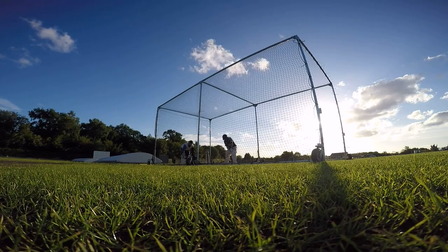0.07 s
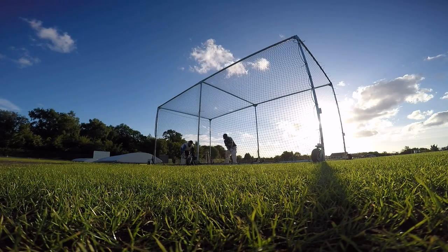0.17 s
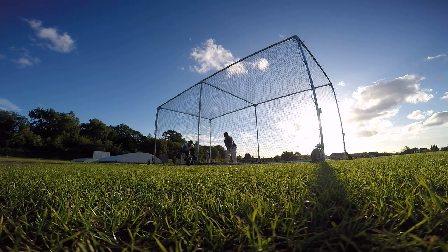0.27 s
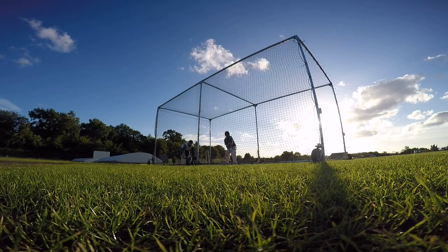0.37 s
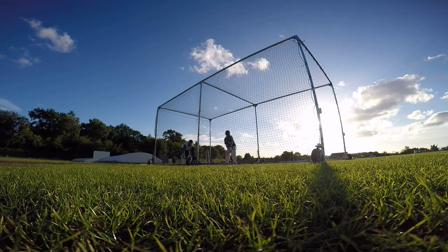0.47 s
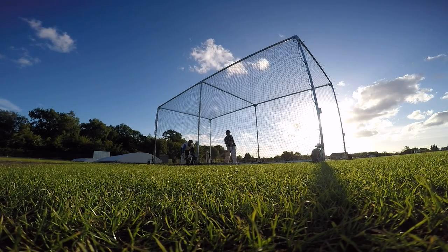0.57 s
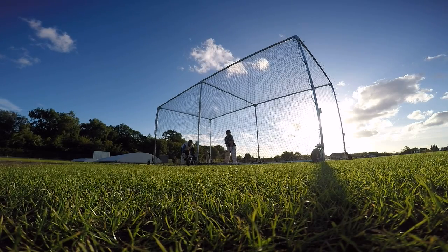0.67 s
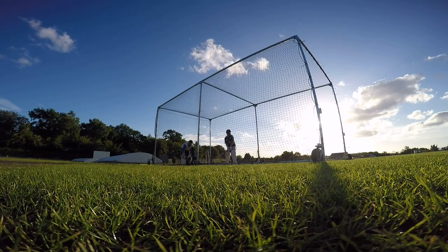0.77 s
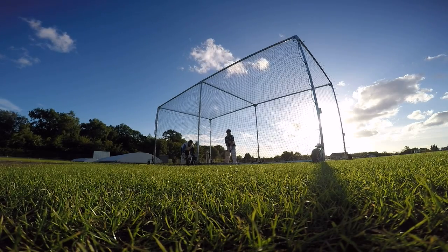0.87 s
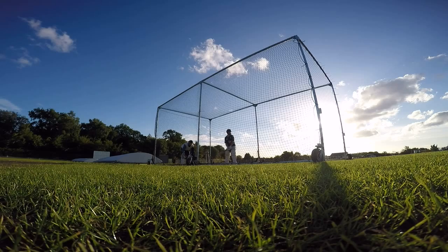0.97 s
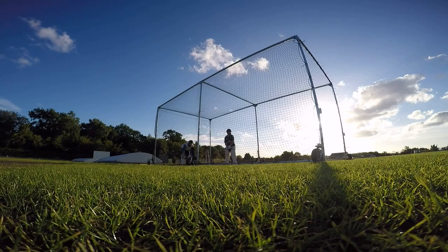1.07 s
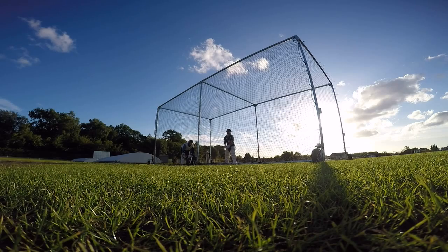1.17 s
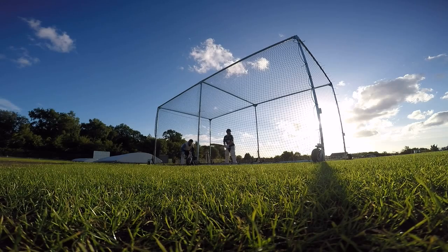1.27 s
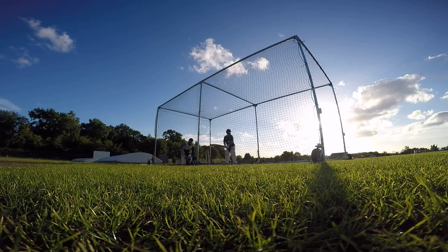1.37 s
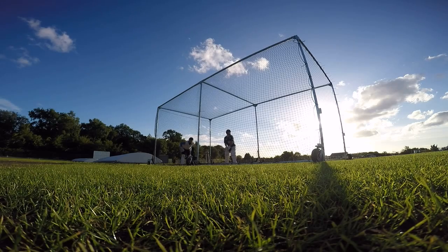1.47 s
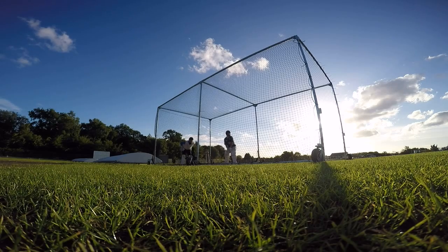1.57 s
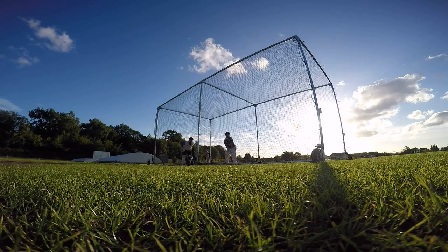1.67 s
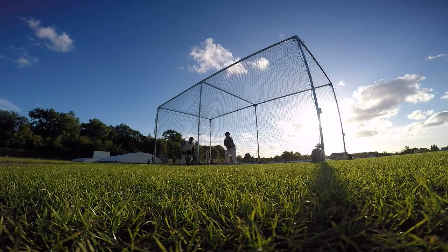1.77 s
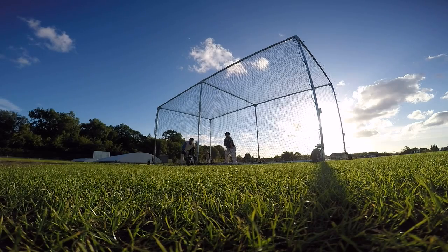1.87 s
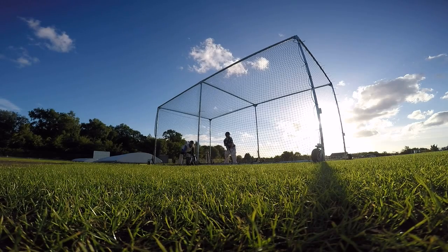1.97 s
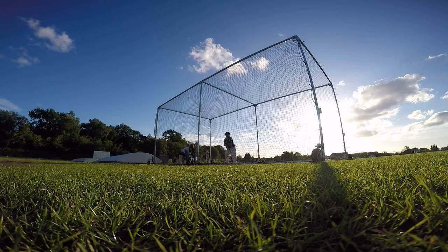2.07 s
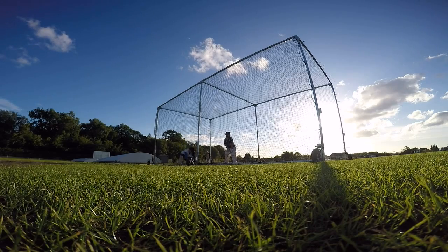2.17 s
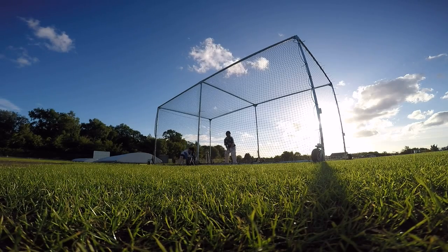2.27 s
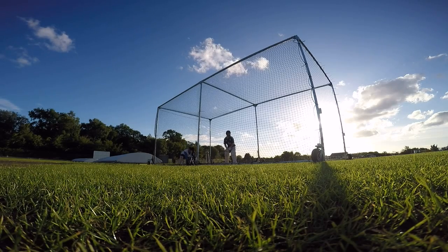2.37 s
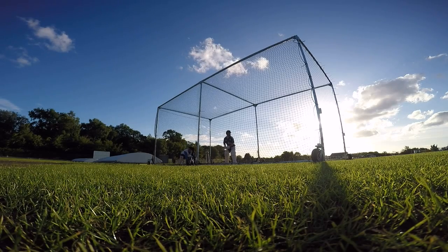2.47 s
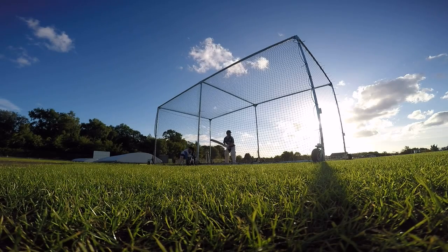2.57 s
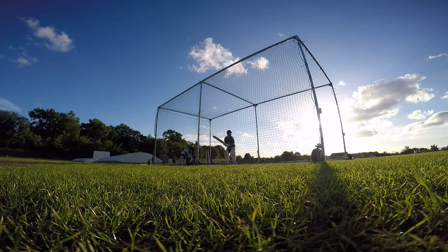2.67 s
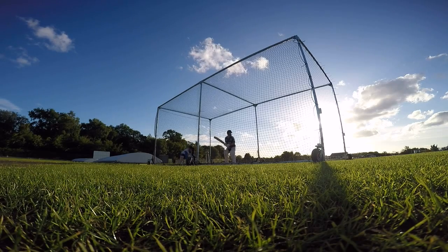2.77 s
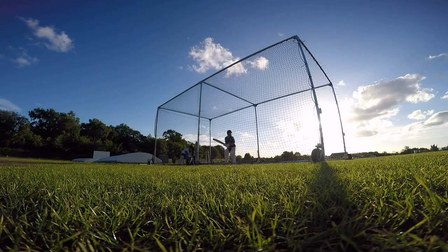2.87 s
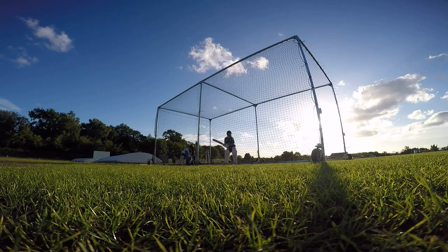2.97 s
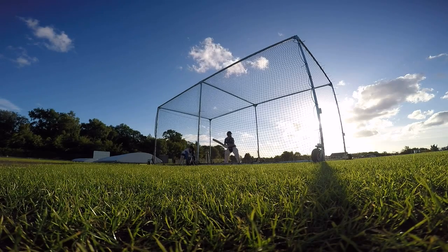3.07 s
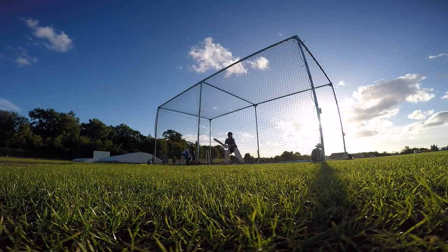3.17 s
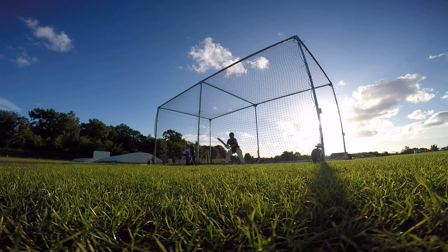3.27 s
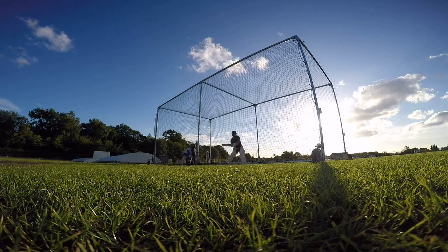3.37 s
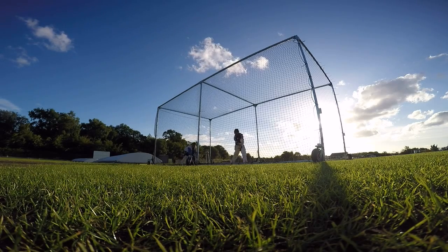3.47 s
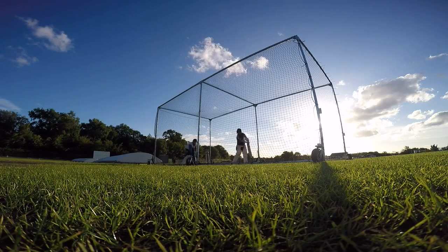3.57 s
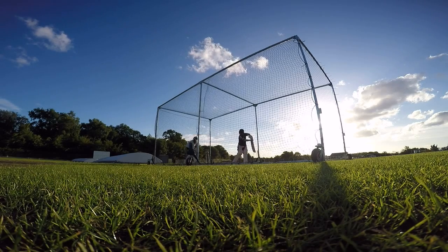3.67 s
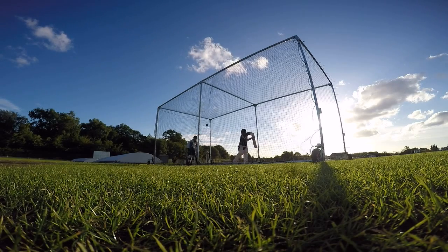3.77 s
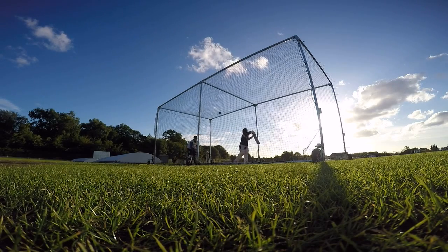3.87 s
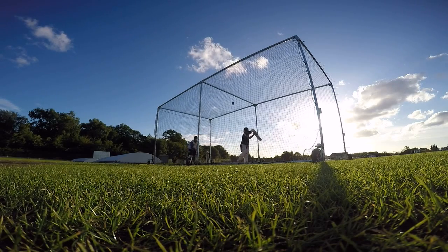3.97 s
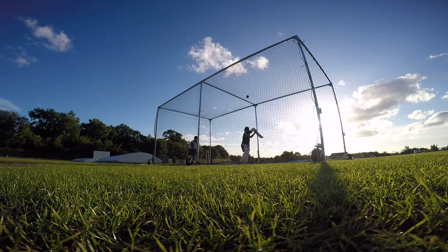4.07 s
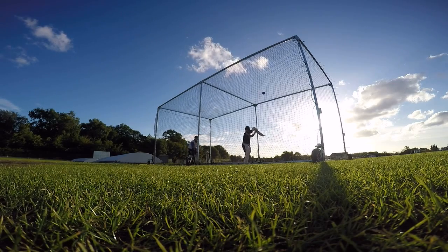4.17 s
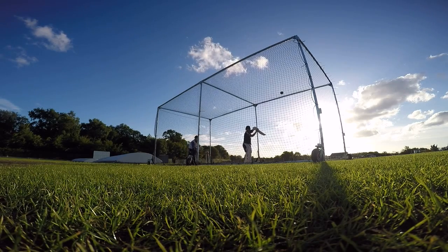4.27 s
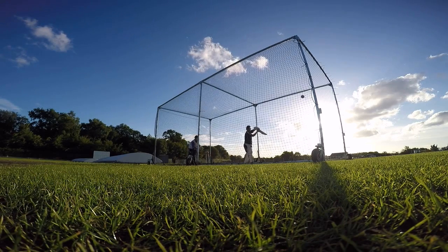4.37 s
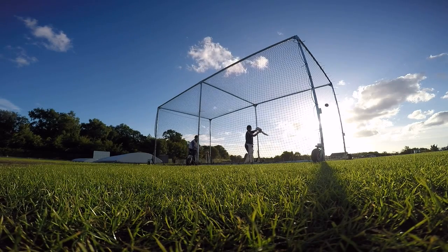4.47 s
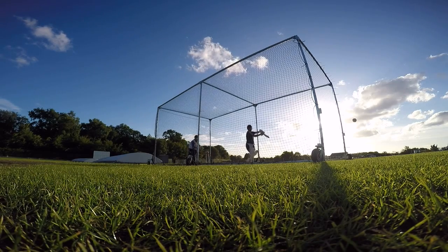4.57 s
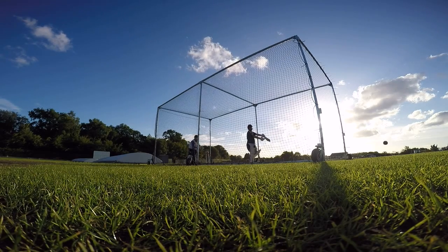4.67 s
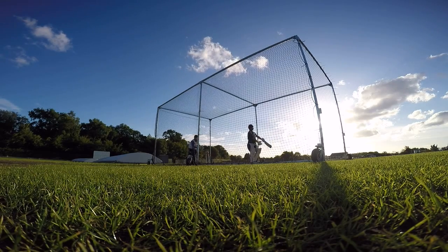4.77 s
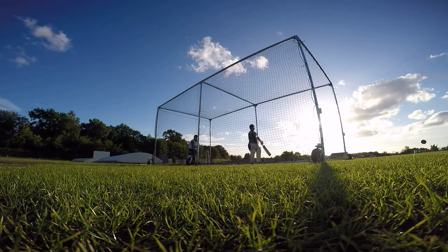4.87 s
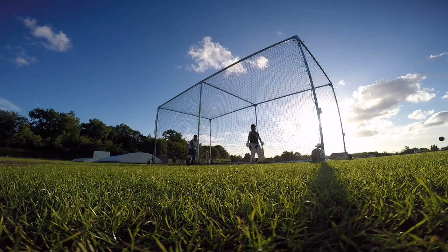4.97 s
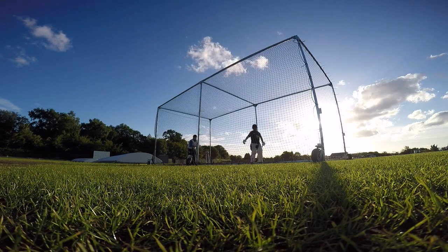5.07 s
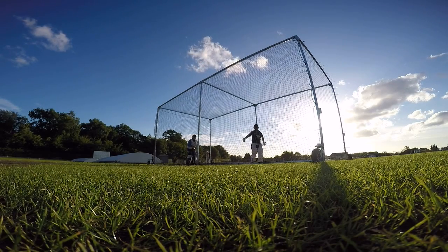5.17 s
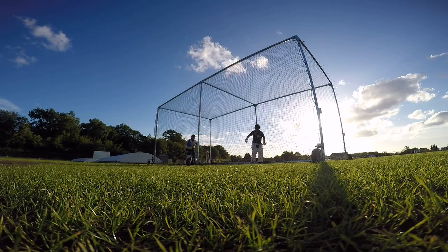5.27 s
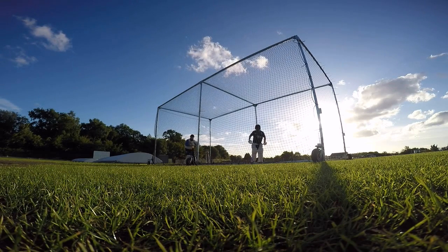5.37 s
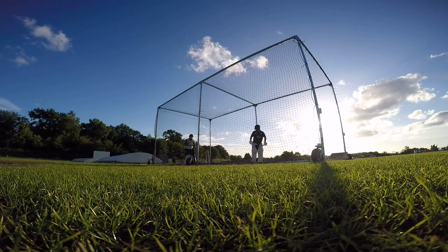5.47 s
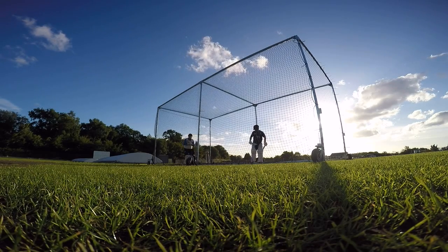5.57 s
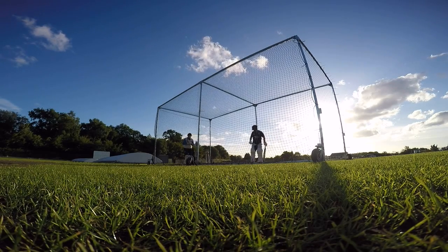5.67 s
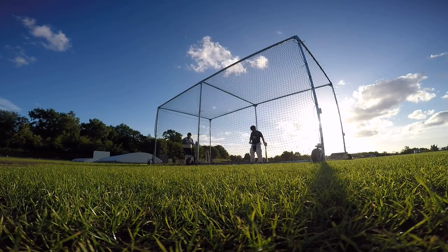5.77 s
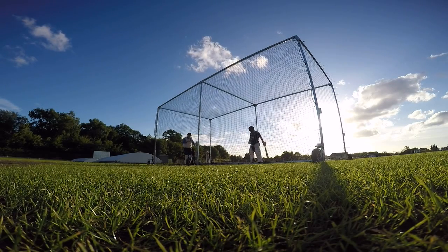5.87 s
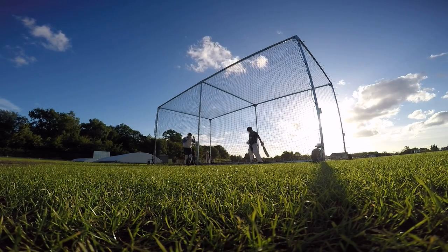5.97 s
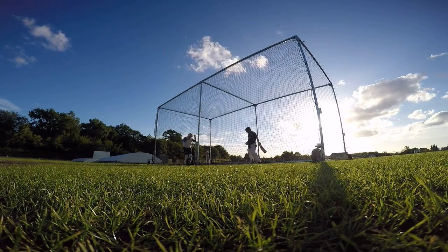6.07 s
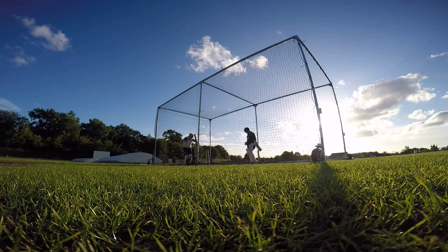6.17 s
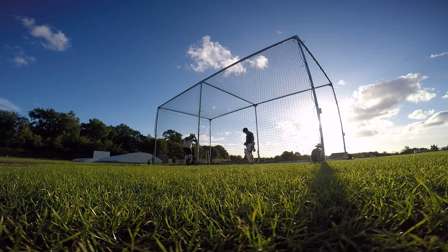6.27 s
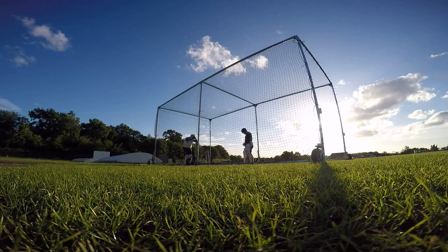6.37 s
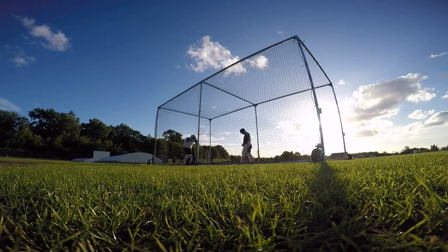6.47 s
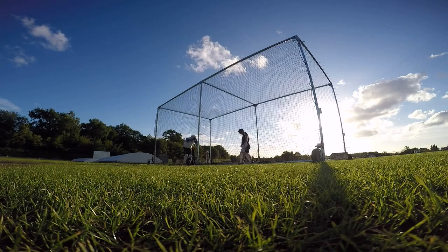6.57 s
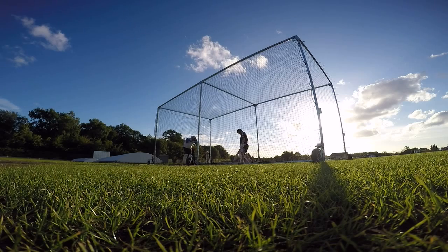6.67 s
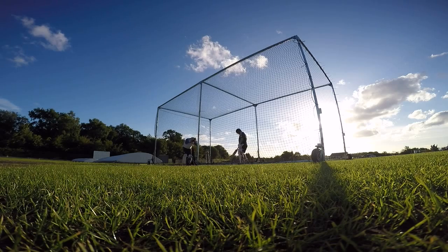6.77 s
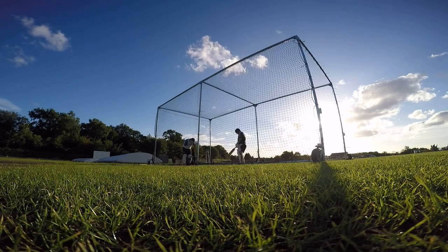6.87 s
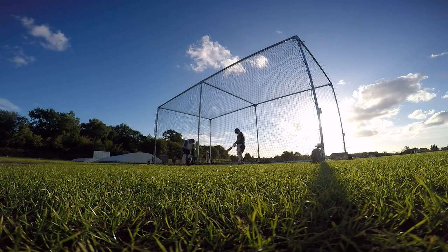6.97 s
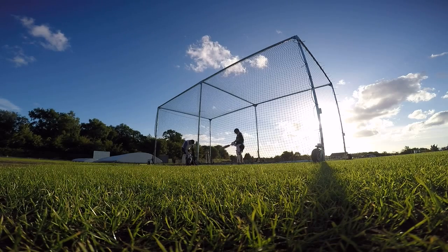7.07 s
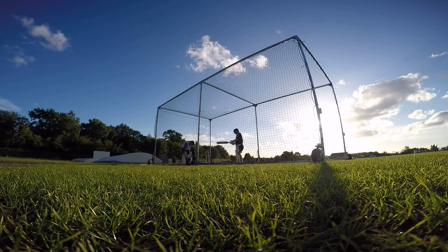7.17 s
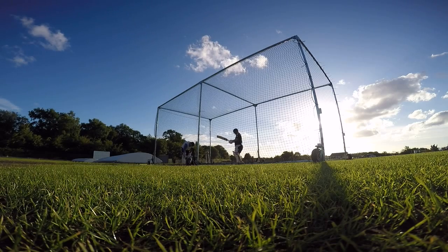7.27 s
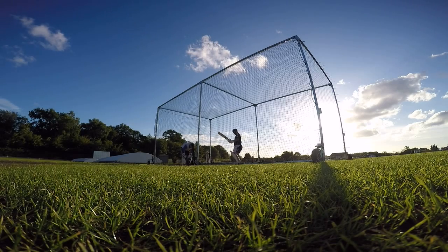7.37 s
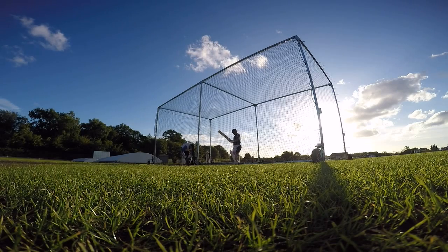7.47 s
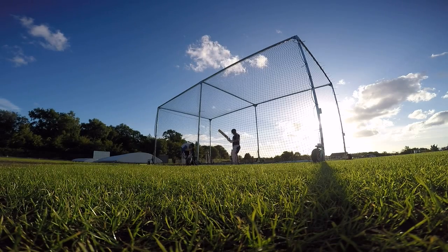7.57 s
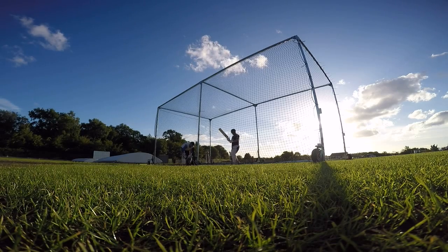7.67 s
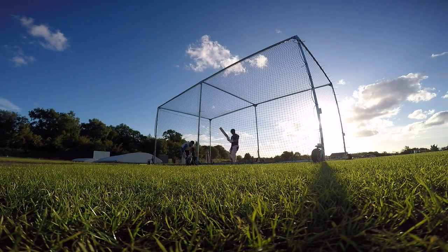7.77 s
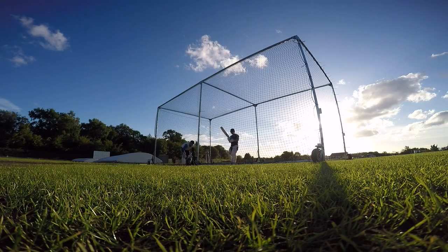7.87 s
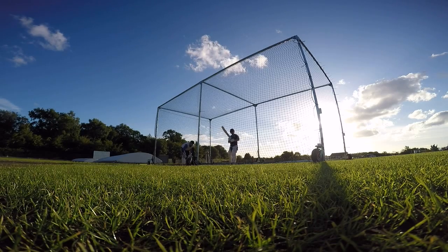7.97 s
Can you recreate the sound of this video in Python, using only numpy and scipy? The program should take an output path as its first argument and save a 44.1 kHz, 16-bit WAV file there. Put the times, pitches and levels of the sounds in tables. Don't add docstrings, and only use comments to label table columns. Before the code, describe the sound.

A bat taps a mat, shoes step and scuff, then one hard overloaded crack of bat on ball, over a sinking propeller drone and wind.

```python
import sys
import numpy as np
from scipy import signal
from scipy.fft import rfft, irfft, next_fast_len
from scipy.io import wavfile
from scipy.ndimage import uniform_filter1d, map_coordinates

SR = 44100
rng = np.random.default_rng(int(sys.argv[2]) if len(sys.argv) > 2 else 0)


def makeup_ratio(level_db):
    decades = np.asarray(level_db, float) / 20
    return 10 ** decades


def store_pcm(level_fs):
    pcm = np.round(np.clip(level_fs, -1, 1) * 32767).astype(np.int16)
    wavfile.write(sys.argv[1], SR, np.atleast_2d(pcm).T)


N = 354563


def unit(x):
    return x / np.sqrt(np.mean(x ** 2) + 1e-20)


def along(points, hz):
    f, value = np.transpose(points)
    return np.interp(np.log(hz + 1), np.log(f + 1), value)


def curve(rows):
    s, value = np.transpose(rows)
    return np.interp(np.arange(N) / SR, s, value)


def wobble(rate):
    knots = rng.standard_normal(int(N * rate / SR) + 4)
    return map_coordinates(knots, [np.arange(N) * rate / SR])


def swells(rows, rest_db):
    t = np.arange(N) / SR
    bells = [makeup_ratio(db) * np.exp(-(2 * (t - s) / length) ** 2) for s, length, db in rows]
    return makeup_ratio(rest_db) + sum(bells)


def coloured(x, spectrum):
    m = next_fast_len(len(x) + 8192)
    gain = makeup_ratio(along(spectrum, np.fft.rfftfreq(m, 1 / SR)))
    return unit(irfft(rfft(x, m) * gain, m)[:len(x)])


def around(hz, octaves):
    return [(hz * 2. ** (octaves * k), -6 * k * k) for k in range(-4, 5)]


# f/Hz, level/dB
HISS_COLOUR = [(500, -11), (1600, -3), (2500, -4), (4000, -5.5), (5200, -7.5), (8000, -13), (10000, -14),
               (15000, -17), (16500, -36.5)]
# f/Hz, rms level/dB
WHINE_TONES = [(6308.7, -72.6), (12557.5, -94), (12587.4, -92), (12617.4, -75)]
# t/s, level/dB
INPUT_GAIN = [(0, 0), (3.512, 0), (3.522, -11), (3.545, -7), (3.62, -6), (3.9, -3.5), (4.08, 0), (8.1, 0)]


def camera_noise():
    t = np.arange(N) / SR
    tones = [np.sqrt(2) * makeup_ratio(db) * np.sin(2 * np.pi * hz * t) for hz, db in WHINE_TONES]
    frame_hz = 29.97
    flips = np.tanh(9 * np.sin(np.pi * frame_hz * t))
    whine = flips * tones[0] + sum(tones[1:])
    hiss = makeup_ratio(-66.0) * coloured(rng.standard_normal(N), HISS_COLOUR)
    return makeup_ratio(curve(INPUT_GAIN)) * (hiss + whine)


# f/Hz, level/dB
ROAR_COLOUR = [(60, -33), (120, -17.5), (160, -15), (270, -14.5), (400, -14.5), (550, -20.5), (760, -29.5),
               (1200, -36), (2000, -50), (3500, -62), (7000, -120)]
# t/s, level/dB
ROAR_LEVEL = [(0, -49), (.24, -50), (1.34, -53.5), (2.55, -53.5), (3.29, -51.5), (6.76, -54), (7.5, -50),
              (8.04, -53.5)]


def far_roar():
    stir = makeup_ratio(1.2 * wobble(4) + 0.88 * wobble(30))
    roar = stir * coloured(rng.standard_normal(N), ROAR_COLOUR)
    return makeup_ratio(curve(ROAR_LEVEL) + 5.5) * roar


# f/Hz, level/dB
BUFFET_COLOUR = [(4, -38.5), (12, -7), (22, 2), (40, -1), (70, -7.5), (110, -17.5), (200, -25.5),
                 (400, -69.5), (1200, -120)]
# centre t/s, length t/s, level/dB
GUSTS_ON_HOUSING = [(.1, .1, -38), (.38, 0.14, -31), (.6, .06, -30), (.72, .1, -27), (.87, 0.13, -26.5),
                    (1.2, 0.43, -39.5), (1.52, .06, -34), (1.65, 0.11, -32.5), (1.81, .1, -29.5),
                    (1.92, 0.057, -25.5), (2.06, .14, -23), (2.4, 0.05, -31.5), (2.8, .5, -33),
                    (3.22, 0.31, -27), (3.6, .12, -33), (3.72, 0.075, -33), (4.1, 0.46, -38.5),
                    (4.49, 0.091, -33), (4.68, 0.09, -35.5), (4.97, .08, -27.5), (5.1, 0.23, -37.5),
                    (5.5, .12, -34), (5.9, .5, -39.5), (6.49, 0.094, -33), (6.63, 0.082, -34),
                    (6.9, 0.18, -37), (7.36, .2, -33.5)]


def wind():
    push = coloured(rng.standard_normal(N), BUFFET_COLOUR)
    push /= np.sqrt(np.abs(uniform_filter1d(push ** 2, size=6000)) + 0.14)
    lumps = makeup_ratio(2.7 * wobble(16)) * push
    calm_db = -41.5
    return swells(GUSTS_ON_HOUSING, calm_db) * unit(lumps)


# t/s, f/Hz
ENGINE_PITCH = [(0, 108.1), (.6, 109.1), (1.3, 108.3), (2.5, 105.6), (2.9, 107), (3.6, 104.1), (4.7, 104.6),
                (5.5, 103.2), (6.5, 102.3), (8.04, 101.1)]
# t/s, level/dB
FUNDAMENTAL_LEVEL = [(0, -21.5), (.27, -29.5), (.8, -29.5), (1.14, -40.5), (1.75, -33), (2.4, -48),
                     (2.88, -43), (3.02, -32), (3.36, -32.5), (3.5, -39.5), (4.38, -29.5), (5.02, -37),
                     (5.5, -24.5), (5.95, -25.5), (6.14, -37), (6.7, -36), (7.02, -25), (8.04, -24.5)]
# centre t/s, length t/s, level/dB
SECOND_SWELLS = [(.08, 0.27, -38), (.46, 0.29, -38), (1.1, .15, -45.5), (1.38, 0.13, -42), (1.92, .3, -47),
                 (3.33, .25, -43.5), (3.75, 0.11, -46.5), (4.33, .25, -44.5), (4.72, 0.28, -46),
                 (5.1, 0.29, -37), (5.55, .5, -38.5), (6.86, 0.24, -43.5), (7.4, 0.42, -36),
                 (7.86, 0.43, -37)]
# centre t/s, length t/s, level/dB
THIRD_SWELLS = [(.06, 0.29, -42), (.55, .35, -46), (1.0, 0.29, -51.5), (1.88, .15, -49.5), (3.25, .15, -55),
                (4.38, 0.24, -48.5), (5.08, .25, -48.5), (5.52, .4, -41), (6.0, 0.14, -47),
                (6.25, 0.17, -51.5), (6.6, .25, -48.5), (7.06, .25, -44.5), (7.49, .25, -36.5),
                (7.76, .2, -45.5)]


def drone():
    veiled_db = -59
    gains = [
        makeup_ratio(curve(FUNDAMENTAL_LEVEL)),
        swells(SECOND_SWELLS, veiled_db),
        swells(THIRD_SWELLS, veiled_db),
    ]
    phase = 2 * np.pi * np.cumsum(curve(ENGINE_PITCH)) / SR + 0.12 * wobble(13)
    out = np.zeros(N)
    for harmonic, gain in enumerate(gains, start=1):
        flutter = makeup_ratio(1.41 * wobble(16))
        out += np.sqrt(2) * gain * flutter * np.sin(harmonic * phase)
    return out


def rub(rows):
    out = np.zeros(N + SR)
    for s, length, db, hz in rows:
        t = np.arange(round(length * 1.4 * SR)) / SR
        push = np.clip(t / 0.013, 0, 1) * np.clip((1.4 - t / length) / 0.58, 0, 1)
        clumps = np.repeat(rng.standard_normal(800), 45)[:len(t)]
        grains = makeup_ratio(4.5 * clumps) * rng.standard_normal(len(t))
        out[round(s * SR):][:len(t)] += makeup_ratio(db) * push * coloured(grains, around(hz, 0.54))
    return out[:N]


# t/s, length t/s, level/dB
PAD_SHUFFLES = [(1.548, .2, -70.5), (2.99, .1, -65.5), (3.152, 0.062, -57.5), (3.334, 0.074, -64),
                (4.996, .03, -59), (6.251, .1, -65.5), (6.579, .22, -67.5), (6.86, 0.044, -63.5),
                (7.28, .045, -64), (7.609, 0.049, -61), (7.726, 0.22, -69)]


def shuffles():
    return rub([(*row, 2240) for row in PAD_SHUFFLES])


# t/s, length t/s, level/dB,
# centre f/Hz
SCUFF_STROKES = [(1.69, 0.024, -42, 180), (2.682, 0.013, -46, 1670), (2.872, .02, -44, 1470),
                 (2.896, 0.095, -54.5, 1450), (2.901, 0.078, -62, 2560), (3.088, 0.11, -60, 1710),
                 (3.216, 0.046, -58.5, 1590), (3.443, 0.07, -55.5, 2660), (3.471, 0.052, -54.5, 1300),
                 (3.539, 0.066, -48, 1410), (3.592, 0.055, -70, 3170), (3.594, 0.16, -57.5, 1180),
                 (3.653, 0.041, -57, 2980), (3.70, 0.13, -65.5, 3220), (3.93, 0.026, -52, 1630),
                 (3.947, 0.17, -69.5, 3500), (3.967, 0.076, -51, 1471), (4.04, 0.12, -59, 1520),
                 (4.184, .2, -65.5, 1630), (4.446, 0.023, -57, 1800), (4.89, 0.012, -46, 1550),
                 (4.797, .02, -47, 190), (3.365, .02, -49, 170), (5.334, 0.034, -69, 1830),
                 (5.719, 0.19, -62.5, 1490), (5.899, 0.12, -71, 3950), (6.62, 0.13, -72, 11500)]


def scuffs():
    return rub(SCUFF_STROKES)


# t/s, length t/s, level/dB
HEEL_CRUNCHES = [(2.876, .017, -39), (3.206, 0.018, -36), (3.581, 0.011, -42), (4.445, 0.022, -45.5),
                 (4.8, .006, -44), (4.894, 0.014, -44), (2.684, .015, -44)]


def crunches():
    return rub([(*row, 850) for row in HEEL_CRUNCHES])


def thud(t, hz, rise, fade_ms, sag):
    u = t / (fade_ms / 1000)
    turns = hz * t + sag * (1 - np.exp(-t / .0006))
    return -(u / rise) ** rise * np.exp(rise - u) * np.sin(2 * np.pi * turns)


# f/Hz, level/dB
CASE_COLOUR = [(3000, 3.5), (3400, -9.5), (4000, -17.5), (16000, -18.5)]


def knocks(rows, click_hz=None):
    out, t = np.zeros(N + SR), np.arange(1500) / SR
    for s, click_db, thud_db, thud_hz, *thin_hz in rows:
        snap = .12 * rng.standard_normal(len(t)) * np.exp(-t / 0.0018)
        snap[26] = -1
        if thin_hz:
            click = coloured(snap, around(thin_hz[0], 0.22))
        else:
            click = coloured(coloured(snap, around(click_hz, .85)), CASE_COLOUR)
        click *= np.clip(t / .0004, 0, 1) / np.abs(click).max()
        low = thud(t, thud_hz, rise=2.2, fade_ms=1.1, sag=.25)
        out[round(s * SR):][:len(t)] += makeup_ratio(click_db + 0.5) * click + makeup_ratio(thud_db + 5.0) * low
    return out[:N]


# t/s, level/dB, f/Hz
THIN_TICKS = [(0.0485, -44, 2800), (.0478, -44, 3600), (1.691, -49, 3080), (3.3702, -34.5, 2880),
              (3.5155, -54, 3800), (3.5797, -45, 3560), (3.5844, -29, 3470), (3.661, -45, 3974),
              (3.709, -57, 3970), (3.735, -51, 3770), (3.747, -52, 3900), (3.756, -57, 4200),
              (3.772, -61, 3800), (3.79, -48, 2950), (3.806, -58, 4180), (3.979, -45, 3640),
              (4.26, -46.5, 3200), (4.8005, -46, 4600), (4.801, -37, 3100), (4.8015, -39, 2300),
              (5.757, -44, 2300), (5.851, -50.5, 3500), (7.325, -61, 4700)]


def ticks():
    return knocks([(s, db, db - 12, 340, hz) for s, db, hz in THIN_TICKS])


# t/s, click level/dB, thud level/dB, thud f/Hz
FIRM_STEPS = [(2.6847, -42, -32.5, 447), (2.6895, -35, -28.5, 303), (2.8744, -37.5, -37, 332),
              (2.8802, -44, -30.5, 495), (2.8903, -21.5, -16, 288), (2.9534, -42, -33, 387),
              (3.2075, -31, -33, 440), (3.2159, -24, -19, 388), (3.2424, -52, -33, 376),
              (3.3688, -35, -21, 340), (3.4909, -43.5, -36, 430), (3.5797, -50, -31.5, 480),
              (3.5845, -45, -23.5, 388), (3.625, -43, -35, 366), (3.9578, -31, -42.5, 420),
              (3.979, -50, -33.5, 426), (4.0143, -41, -31, 308), (4.0297, -30.5, -24.5, 485),
              (4.4518, -32.5, -31, 404), (4.4592, -40, -33.5, 514), (4.4664, -44, -28, 329),
              (4.8, -23.5, -23.5, 328.8), (4.8953, -33, -29.5, 322), (5.3299, -36.5, -27.5, 436),
              (5.3412, -30, -33.5, 293), (5.3554, -43, -30.5, 305)]
# t/s, click level/dB
LIGHT_FOOTFALLS = [(1.9455, -45.5), (2.0944, -46), (2.3041, -39), (3.0464, -41.5), (3.944, -49),
                   (4.821, -47), (5.0032, -43), (5.225, -46), (5.7573, -39.5), (6.3327, -39.5),
                   (6.8812, -46), (7.2946, -46), (7.6218, -44)]


def footsteps():
    light = [(s, db, db + 1.5, 340) for s, db in LIGHT_FOOTFALLS]
    return knocks(FIRM_STEPS + light, click_hz=1520)


# t/s, click level/dB, thud level/dB
BAT_TAPS = [
    (0.0481, -24.5, -11),
    (1.6934, -38, -12),
]
# delay t/s, click loss level/dB, thud loss level/dB, thud f/Hz
PARTS_OF_TAP = [
    (0, 1, 0, 420),
    (.0082, 13.5, 19, 290),
    (.043, 26, 21.5, 307),
]


def bat_taps():
    rows = []
    for s, click_db, thud_db in BAT_TAPS:
        for lag, click_loss, thud_loss, hz in PARTS_OF_TAP:
            rows.append((s + lag, click_db - click_loss, thud_db - thud_loss, hz))
    return knocks(rows, click_hz=1270)


# t/s, level/dB, f/Hz, rise power, fade t/ms
BAT_SWINGS = [(3.5331, 9.5, 995, 1.2, 0.38), (3.5342, 13, 385, 2.1, .45), (3.5335, -22.5, 1200, .3, 6.1),
              (3.5375, -18, 233, 1.33, 1.92), (3.236, -27, 400, 1.6, 7.4), (.0482, -17, 1000, 1.3, .6),
              (.0908, -31, 800, 1.3, 1.1), (1.7365, -33, 630, 1.6, 1.4), (3.548, -32.5, 1180, 1.2, 3.3),
              (3.5335, -22.5, 2700, .3, 1.4), (3.5335, -24, 4800, .3, 1.2)]
# f/Hz, level/dB
CRACK_COLOUR = [(300, -13.5), (1200, 10), (2800, -4.5), (5000, -13), (7000, -23.5), (10000, -27),
                (16000, -40)]


def strike():
    out, t = np.zeros(N + SR), np.arange(4000) / SR
    for s, db, hz, rise, fade_ms in BAT_SWINGS:
        out[round(s * SR):][:len(t)] += makeup_ratio(db) * thud(t, hz, rise, fade_ms, sag=0)
    fade = makeup_ratio(-12.5 - 60 * t / 0.016) + makeup_ratio(-31.5 - 60 * t / 0.091)
    crack = coloured(rng.standard_normal(len(t)), CRACK_COLOUR) * fade
    out[round(BAT_SWINGS[0][0] * SR):][:len(t)] += crack
    return out[:N]


# f/Hz, t/s
ECHO_FADE = [(200, 0.071), (1100, 0.14), (3000, 0.04), (10000, 0.0301)]


def echoes(x):
    hz, t, z = signal.stft(rng.standard_normal(SR // 3), SR, nperseg=128)
    fade = makeup_ratio(-60 * t / along(ECHO_FADE, hz)[:, None])
    tail = signal.istft(z * fade, SR, nperseg=128)[1]
    late = np.pad(x, (160, 0))
    return signal.fftconvolve(late, tail / np.linalg.norm(tail))[:N]


def scene():
    background = far_roar() + wind() + drone()
    rubbing = shuffles() + scuffs() + crunches()
    contacts = ticks() + footsteps() + bat_taps()
    blow = strike()
    scattered = echoes(makeup_ratio(-20.0) * contacts + makeup_ratio(-32.5) * blow)
    return (background + rubbing + contacts + blow + scattered)[None]


def band_limit(x):
    return signal.sosfilt(signal.butter(12, 15300, fs=SR, output="sos"), x)


def record(dry):
    flat = dry / (1 + np.abs(dry / .99) ** 5) ** (1 / 5)
    case_hz = 7000
    keep = np.exp(-2 * np.pi * case_hz / SR)
    rounded = signal.lfilter([1 - keep], [1, -keep], flat)
    mix = rounded + camera_noise()
    return band_limit(mix)


dry = scene()
out = record(dry)
store_pcm(out)
```